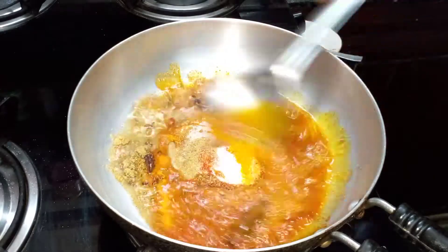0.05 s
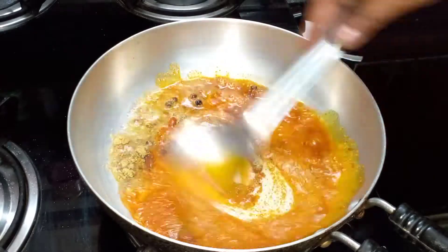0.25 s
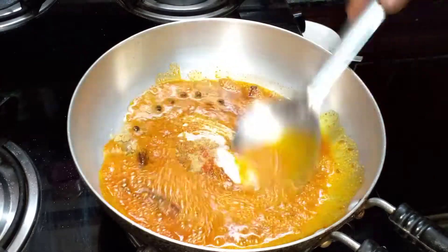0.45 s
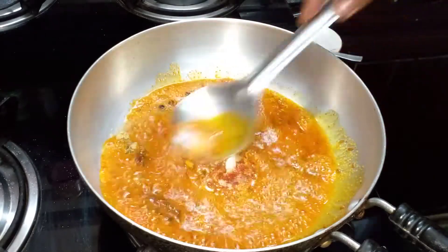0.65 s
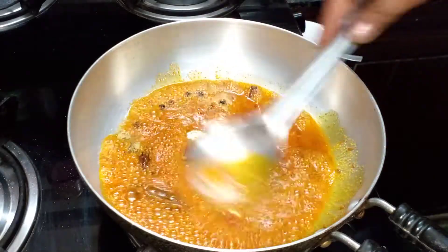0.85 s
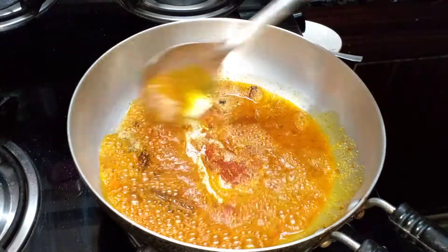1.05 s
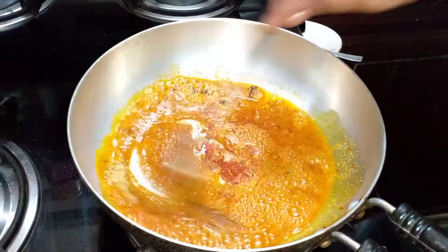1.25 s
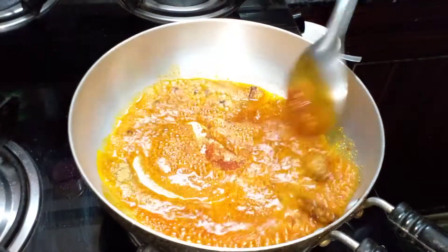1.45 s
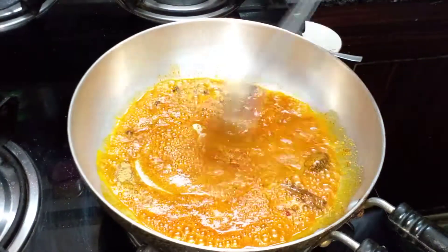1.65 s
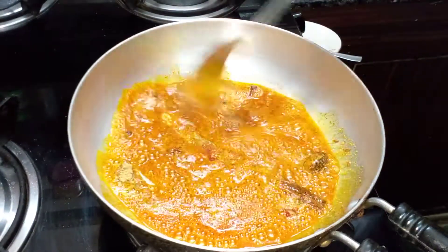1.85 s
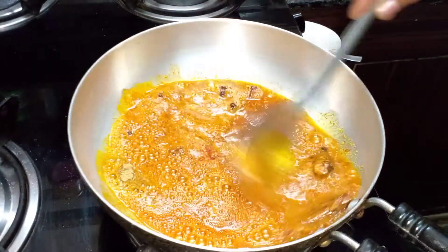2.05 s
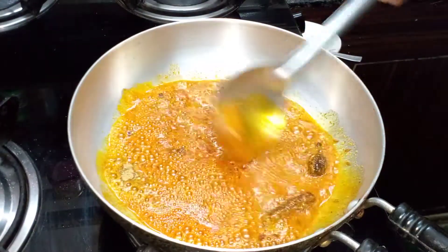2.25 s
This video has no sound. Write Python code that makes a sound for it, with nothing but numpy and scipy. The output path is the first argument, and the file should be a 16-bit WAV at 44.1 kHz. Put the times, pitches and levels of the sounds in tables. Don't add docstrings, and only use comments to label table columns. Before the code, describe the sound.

A metal ladle scrapes around a thin metal pan of hot spiced oil, with uneven ringing strokes, ticks and knocks; soft sizzle gradually calms. Close microphone in a home kitchen with faint low rumble.

```python
import sys
import numpy as np
from scipy import signal
from scipy.fft import rfft, irfft
from scipy.io import wavfile

SR = 44100
rng = np.random.default_rng(int(sys.argv[2]) if len(sys.argv) > 2 else 0)


def waveform_to_disk(signal):
    frames = np.transpose(np.atleast_2d(signal))
    scaled = np.clip(frames, -1, 1) * 32767
    samples = np.round(scaled).astype(np.int16)
    wavfile.write(sys.argv[1], SR, samples)


def makeup_ratio(level_db):
    decades = np.asarray(level_db, float) / 20
    return 10 ** decades


N = 101429


def rms_one(x):
    return x / np.sqrt(np.mean(x ** 2) + 1e-20)


def in_time(rows):
    return np.interp(np.arange(N) / SR, *np.transpose(rows))


def drift(hz):
    pole = np.exp(-40 * np.pi * hz / SR)
    noise = rng.standard_normal(N // 20 + 3002)
    slow = signal.lfilter([1], [1, -2 * pole, pole * pole], noise)[3000:]
    return np.interp(np.arange(N) / 20, np.arange(len(slow)), rms_one(slow))


def ring(x, hz, t60):
    radius = makeup_ratio(-60 / (max(t60, .002) * SR))
    angle = 2 * np.pi * hz / SR
    return signal.lfilter([0, np.sin(angle)], [1, -2 * radius * np.cos(angle), radius ** 2], x + 1e-18)


def clicks(per_s, spread_db):
    sizes = makeup_ratio(spread_db * np.minimum(rng.exponential(1, N), 4)) * rng.standard_normal(N)
    return rms_one(sizes * (rng.random(N) < per_s / SR))


def coloured(x, spectrum):
    hz, db = np.transpose(spectrum)
    f = np.maximum(np.fft.rfftfreq(N, 1 / SR), 1)
    octaves_out = np.maximum(np.log2(hz[0] / f), 0) + np.maximum(np.log2(f / hz[-1]), 0)
    gain = makeup_ratio(np.interp(np.log(f), np.log(hz), db) - 18 * octaves_out)
    return irfft(rfft(x) * rms_one(gain), N)


def high_pass(x, hz):
    return signal.sosfilt(signal.butter(4, hz, "high", fs=SR, output="sos"), x)


# pitch_hz [Hz], density_db [dB per Hz]
ROOM_SPECTRUM = [(12, -58), (20, -1), (141, -10.5), (221, -15), (431, -14), (597, -11), (642, -8),
                 (1500, -36), (1950, -54), (3300, -120)]
# time_s [s], level_db [dB]
ROOM_LEVEL = [(0, -74.5), (.5, -70.5), (1.2, -70.5), (1.5, -78.5), (1.9, -65), (2.3, -74.5)]


def room_tone():
    rumble = makeup_ratio(in_time(ROOM_LEVEL)) * coloured(rng.standard_normal(N), ROOM_SPECTRUM)
    hum = makeup_ratio(-80) * rms_one(ring(rng.standard_normal(N), 98, 0.22))
    return rumble + hum


# time_s [s], level_db [dB]
SIZZLE_LEVEL = [(0.0, -53.5), (0.45, -53), (0.85, -54), (1.14, -56), (1.52, -57), (1.77, -53),
                (2.08, -59.5), (2.3, -58)]
# pitch_hz [Hz], density_db [dB per Hz]
SIZZLE_SPECTRUM = [(710, -67), (1200, -29), (2630, -5), (2890, -6), (5160, -1.5), (5630, -2), (7850, -4.5),
                   (15600, -25.5)]


def sizzle():
    pops = clicks(per_s=9400, spread_db=-2.5)
    level_db = in_time(SIZZLE_LEVEL) - 3.0 + 0.4 * drift(21)
    return makeup_ratio(level_db) * coloured(pops, SIZZLE_SPECTRUM)


# time_s [s], level_db [dB]
AIR = [(0, -60), (.35, -62), (.65, -64), (.9, -67), (1.25, -71), (1.6, -75.5), (2.3, -74)]


def airy_crackle():
    flecks = high_pass(clicks(per_s=5000, spread_db=1.1), 9000)
    patches_db = -1 * drift(13)
    return makeup_ratio(in_time(AIR) + patches_db) * flecks


# start_s [s], peak_db [dB], pitch_hz [Hz]
SPITS = [
    (0.012, -42, 6400),
    (.048, -46, 12900),
    (0.067, -45, 3500),
    (0.103, -41.5, 8160),
    (0.495, -39, 7000),
    (0.666, -41, 7200),
    (.668, -54, 10500),
]


def spits():
    out, t60_s = np.zeros(N), 0.012
    for start_s, peak_db, pitch_hz in SPITS:
        hit = np.zeros(N)
        hit[int(start_s * SR)] = makeup_ratio(peak_db)
        out += 0.58 * (ring(hit, pitch_hz * .94, t60_s) + ring(hit, pitch_hz * 1.06, t60_s))
    return out


# start_s [s], level_db [dB], fade_s [s to fall 20 dB], brightness_db [dB]
LANDINGS = [(.134, -57.5, 0.15, 9.5), (0.21, -48, 0.09, 9.5), (0.332, -51, 0.17, -14),
            (0.495, -41.5, 0.09, 1), (0.539, -40.5, 0.1257, -4.5), (.788, -49, 0.4, -6),
            (1.01, -38, 0.0263, -10), (1.535, -50, 0.25, 4.5), (1.707, -36, 0.045, -2.5),
            (1.823, -44, 0.0259, 9), (1.944, -51, .1, 9.5), (1.957, -41.5, 0, 0), (2.021, -58, 0.02, 12.5)]
# peak_s [s], level_db [dB], swell_s [s to rise 20 dB],
# fade_s [s to fall 20 dB], brightness_db [dB]
DRAGS = [(.005, -56, -3, 0.2, 3.5), (.235, -55, 0.8, 0.28, 4.5), (0.347, -43.5, -1.6, .06, 2),
         (0.364, -36.5, .04, 0.0643, -5.5), (.39, -46, -1, 0.09, -3.5), (.44, -50, -3, 0.27, -2),
         (0.517, -43, -1.5, -0.0047, -1), (0.571, -43.5, -0.2, -0.0048, -5), (.61, -56, -2, 0.17, -1),
         (0.654, -58, -2.1, 0.23, -3), (0.833, -41, -0.05, 0.04, -5.5), (.865, -43.5, .05, 0.03, 3),
         (.9, -57.5, 0.6, 0.15, 6), (.97, -61.5, -4, 0.23, 4), (1.036, -40.5, .05, 0.06, -1.5),
         (1.066, -47.5, -0.4, 0.07, 2.5), (1.088, -43.5, -0.3, 0.02, 1.5), (1.123, -52.5, 0.2, 0.1243, 6),
         (1.16, -52.5, 0.03, 0.08, 2), (1.189, -48.5, 0.08, 0.09, 8.5), (1.225, -48.5, 0.13, 0.07, 7),
         (1.255, -45.5, 0.2, 0.0666, 3), (1.29, -51.5, 0.35, -0.05, 3), (1.331, -58, 0.3, 0.09, 8.5),
         (1.366, -63.5, -1.5, 0.15, 10), (1.563, -37, 0.1, 0.0529, 1.5), (1.588, -44.5, 5, .06, -0.5),
         (1.644, -53.5, -0.6, 0.16, 2.5), (1.734, -41.5, .05, 0.0336, 1.5), (1.77, -48, -1, 0.06, 1),
         (1.805, -46, .06, 0.04, 3), (1.847, -39, -0.1, 0.03, 4), (1.88, -48, .05, 0.08, 5),
         (1.976, -47, -0.2, 0.0365, 6), (2.03, -54.5, .08, 0.09, 5), (2.07, -60.5, 8, 0.16, -4),
         (2.12, -67, -5.5, 0.25, 7)]


def pressure():
    t = np.arange(N) / SR
    landing_rise_s, round_top = 0.0006, 0.16
    strokes = [(s + .002, db, landing_rise_s, fade, bright_db, 0) for s, db, fade, bright_db in LANDINGS]
    strokes += [(s, db, max(swell, .015), fade, bright_db, round_top)
                for s, db, swell, fade, bright_db in DRAGS]
    plain, bright = 0, 0
    for s, db, swell, fade, bright_db, top in strokes:
        away = np.maximum((s - t) / max(swell, 1e-3), (t - s) / max(fade, .02))
        stroke_db = db - 20 * (np.hypot(away, top) - top)
        landed = t >= max([0] + [row[0] for row in LANDINGS if row[0] < s])
        power = landed * makeup_ratio(2 * np.maximum(stroke_db, -150))
        plain = plain + power
        bright = bright + power * makeup_ratio(2 * bright_db)
    judder = makeup_ratio(1.0 * drift(120))
    return np.sqrt(plain) * judder, np.sqrt(bright) * judder


# time_s [s], pitch_hz [Hz]
BEARING = [(0, 2600), (.22, 2660), (.37, 2080), (.5, 2090), (.53, 2650), (.6, 2300), (.8, 2970),
           (.84, 2310), (.875, 3020), (1.01, 2920), (1.12, 2800), (1.16, 4900), (1.195, 4900),
           (1.215, 2350), (1.3, 2300), (1.55, 2750), (1.72, 2260), (1.84, 4650), (1.97, 2360), (2.3, 2810)]


def body(force, modes, favour_db=0., bearing_rows=BEARING):
    total = np.sqrt(sum(makeup_ratio(2 * db) for _, db, _ in modes))
    bearing_hz, favour_octaves = in_time(bearing_rows), .16
    out = np.zeros(N)
    for k, (hz, db, t60) in enumerate(modes):
        nearness = np.exp(-(np.log2(hz / bearing_hz) / favour_octaves) ** 2)
        share = makeup_ratio(2.0 * drift(8) + favour_db * nearness)
        gain = makeup_ratio(db) / total * np.sqrt(4 * np.log(1000) / t60 / SR)
        out += (-1) ** k * gain * ring(force * share, hz, t60)
    return out


def damped(modes, t60_s):
    return [(hz, db, min(t60, t60_s)) for hz, db, t60 in modes]


# pitch_hz [Hz], level_db [dB], t60_s [s]
PAN_BOWL = [(718, -16, 0.2), (770.4, -3.5, 0.069), (793, -2, 0.093), (824.5, -8, 0.042), (847.1, 2, 0.09),
            (867.7, 0.5, 0.082), (888, -1, 0.14), (964, -5, 0.05), (983, -2, 0.08), (1004.5, -4.5, 0.1),
            (1019.4, -1.5, 0.053), (1044, -4.5, 0.033), (1060, -9, 0.05), (1111, -12, 0.27)]
WALL_HZ = (820, 916, 1042)


def bowl(force):
    wall = body(force, [(hz, 0, 0.017) for hz in WALL_HZ])
    return high_pass(body(force, PAN_BOWL) + makeup_ratio(-2) * wall, 515)


# time_s [s], level_db [dB], pitch_hz [Hz]
RIM = [(0, -9, 1310), (.2, -2.5, 1320), (.36, -13, 1440), (.5, -12, 1520), (.65, -10.5, 1270),
       (.85, -11, 1380), (.96, 1, 1600), (1.02, -14, 1620), (1.07, -2, 1630), (1.16, -24, 1620),
       (1.22, -5, 1370), (1.29, -1.5, 1390), (1.45, -5.5, 1610), (1.56, -9, 1340), (1.72, -5.5, 1300),
       (1.85, -9, 1290), (1.97, -6, 1330), (2.3, -11, 1430)]
# pitch_hz [Hz], level_db [dB], t60_s [s]
PAN_RIM = [(1236, -1.5, 0.099), (1317, -0.5, 0.081), (1370, 0.5, 0.05), (1464, -4.5, 0.094),
           (1552, -1, 0.08), (1647, 4, 0.094)]


def rim(force):
    favour_db = 6
    share = makeup_ratio(in_time([(s, db) for s, db, _ in RIM]) - favour_db / 2)
    return high_pass(body(force * share, PAN_RIM, favour_db, [(s, hz) for s, _, hz in RIM]), 860)


# time_s [s], level_db [dB]
WEIGHT = [(0, -6), (.2, -15), (.25, -13.5), (.35, -12.5), (.43, -11.5), (.5, -17.5), (.57, -12), (.7, -21),
          (.83, -16.5), (.95, -12), (1.02, -14), (1.12, -2), (1.22, -3.5), (1.36, -8.5), (1.53, -12),
          (1.57, -5.5), (1.65, -4), (1.72, -9), (1.82, -1), (1.97, -14.5), (2.3, -13)]
# pitch_hz [Hz], level_db [dB], t60_s [s]
PAN_DEEP = [(303, -6, 0.066), (333.5, 0, .1), (384.5, 2.5, .13), (459.2, 1.5, .1), (485.4, 3.5, .1),
            (567, -9.5, 0.056), (669, 2, .1)]
# pitch_hz [Hz], density_db [dB per Hz]
THUMP = [(70, 1), (105, 8.5), (180, 7.5), (260, -36)]


def deep_pan(force):
    heavy = force * makeup_ratio(in_time(WEIGHT))
    modes = high_pass(body(heavy, damped(PAN_DEEP, .09)), 205)
    return modes + makeup_ratio(-19.5) * coloured(heavy, THUMP)


# pitch_hz [Hz], level_db [dB], t60_s [s]
LADLE = [(1620, 2.5, 0.052), (1826, 2.5, 0.12), (2075, -3.5, 0.13), (2282, -3, 0.2), (2459, -1.5, 0.11),
         (2659, -2, 0.036), (2774, -3, 0.16), (2932, 0, 0.049), (3000, -3, 0.014), (3840, -37, 0.17),
         (4290, -26, 0.12), (4830, -2.5, 0.069), (6150, -5, 0.047), (7600, -14, 0.1)]


def ladle(force):
    modes = body(force, damped(LADLE, .08), favour_db=11)
    return high_pass(makeup_ratio(-13) * modes, 1360)


# pitch_hz [Hz], density_db [dB per Hz]
GRIT = [(710, -66), (1200, -6.5), (1500, -5.5), (1920, -7.5), (2830, -5.5), (7760, -14), (10400, -27.5),
        (15600, -30)]


def rasp(bright):
    return makeup_ratio(-6) * coloured(clicks(10000, 1) * bright, GRIT)


def scraping():
    plain, bright = pressure()
    grains = clicks(per_s=7000, spread_db=1.8)
    pan = bowl(grains * plain) + rim(grains * plain) + deep_pan(grains * plain)
    return pan + ladle(grains * bright) + rasp(bright)


# start_s [s], tick_db [dB], tick_hz [Hz], knock_db into the bowl [dB]
TOUCHES = [(.134, -45, 2140, -53), (.212, -29.5, 2580, -46), (.333, -38, 2620, -52),
           (.339, -52, 2000, -43.5), (.353, -41, 2060, -55), (.360, -51, 2100, -38),
           (.494, -31.5, 2000, -35), (.541, -37, 1790, -30), (.788, -43, 2920, -58), (.860, -34, 7200, -43),
           (1.012, -35.5, 3000, -31.5), (1.184, -33.5, 2360, -46), (1.187, -30, 4800, -45),
           (1.536, -33.5, 2700, -49), (1.580, -36, 3000, -38.5), (1.644, -38, 2830, -65),
           (1.707, -22.5, 2510, -33.5), (1.725, -37.5, 6200, -36.5), (1.735, -35, 5400, -41),
           (1.797, -45, 3430, -51), (1.824, -36, 5300, -38.5), (1.837, -31.5, 4260, -38),
           (1.958, -36.5, 2340, -40), (2.023, -36, 2450, -52)]


def ticks():
    out, cycles = np.zeros(N), 25.5
    for start_s, tick_db, hz, _ in TOUCHES:
        i = int(start_s * SR)
        hit = makeup_ratio(tick_db) * (np.arange(N - i)[:2000] == 0)
        t60_s = cycles / hz
        tick = ring(hit, hz, t60_s)
        tick = tick - .5 * ring(hit, hz * 1.2, t60_s) - 0.33 * ring(hit, hz * 0.784, t60_s)
        out[i:i + 2000] += tick + .3 * ring(hit, hz * 1.9, .004)
    return high_pass(out, 1230)


def knocks():
    start_s, _, _, knock_db = np.transpose(TOUCHES)
    at = (start_s * SR).astype(int)
    knock = np.zeros(N)
    for hz, db, t60 in PAN_BOWL:
        hits = np.zeros(N)
        uneven_db = 3.5 * rng.normal(0, 1, len(at))
        hits[at] = makeup_ratio(knock_db + db - 13 + uneven_db)
        knock += ring(hits, hz, t60)
    soft_hz, soft_t60_s = 874, 0.02
    gain = np.log(1000) / soft_t60_s / SR * 4
    return gain * high_pass(ring(knock, soft_hz, soft_t60_s), 566)


def scene():
    oil = sizzle() + airy_crackle() + spits()
    return (room_tone() + oil + scraping() + ticks() + knocks())[None, :]


def top_cut(x):
    return signal.sosfilt(signal.butter(12, 15740, fs=SR, output="sos"), x)


def record(dry):
    hiss = makeup_ratio(-70) * high_pass(rng.standard_normal(N), 9250)
    passed = np.fft.rfftfreq(N, 1 / SR) < 15780
    mix = irfft(rfft(dry + hiss) * passed, N)
    return top_cut(mix)


dry = scene()
out = record(dry)
waveform_to_disk(out)
```